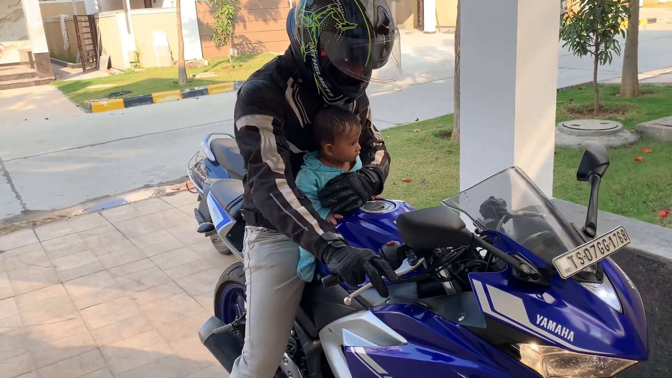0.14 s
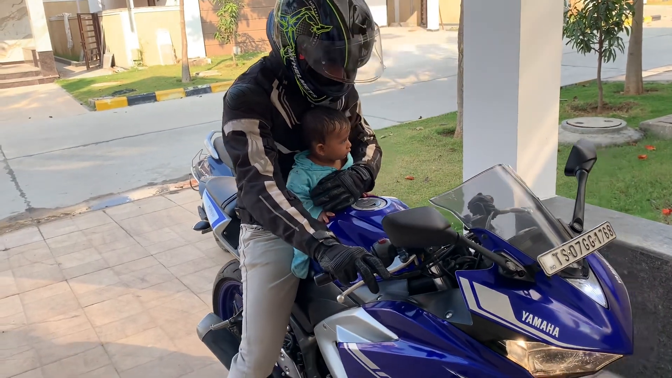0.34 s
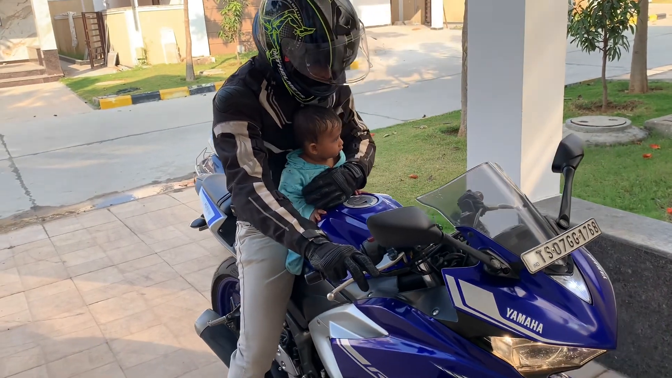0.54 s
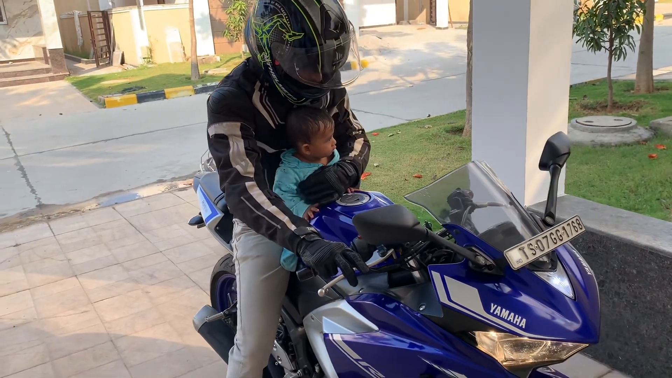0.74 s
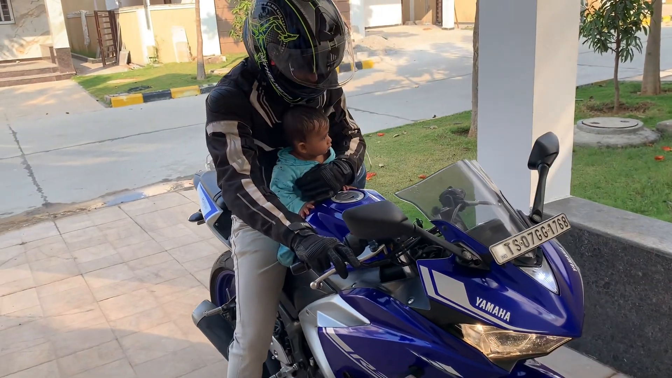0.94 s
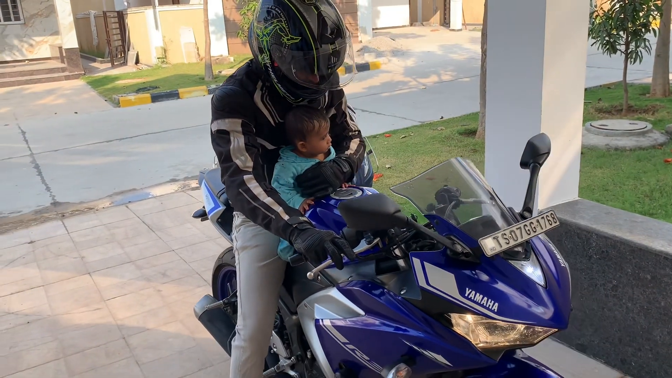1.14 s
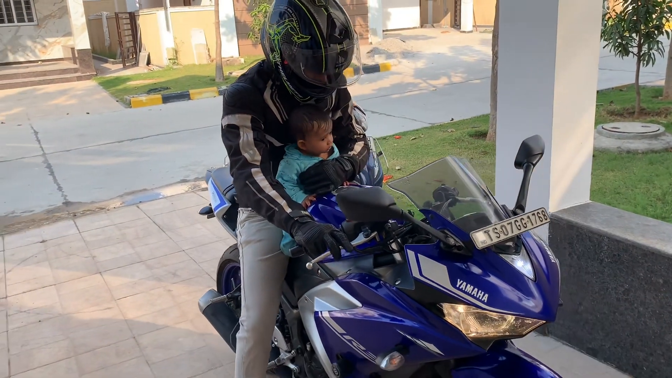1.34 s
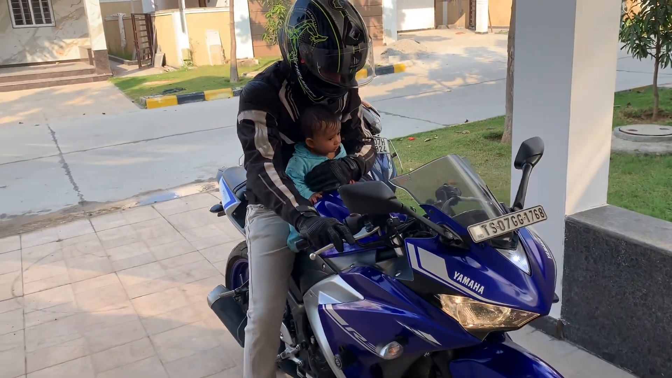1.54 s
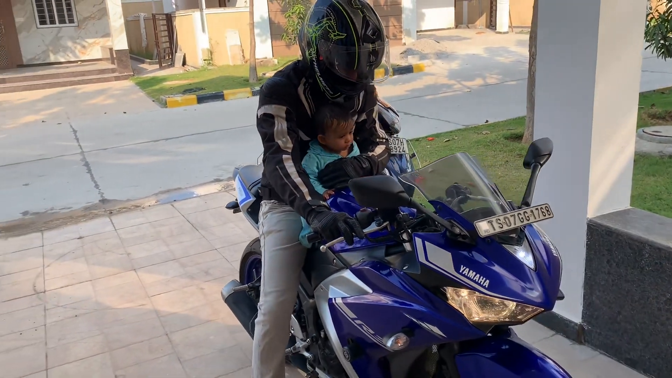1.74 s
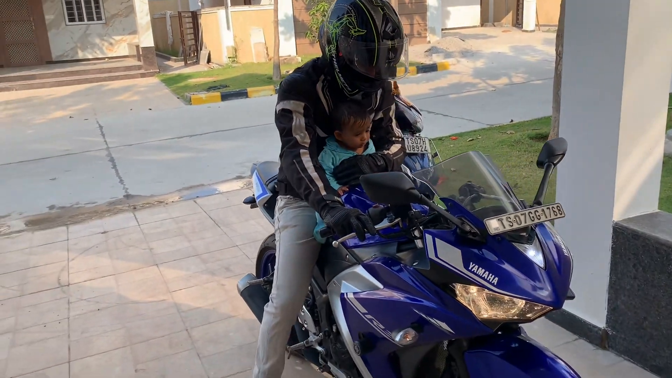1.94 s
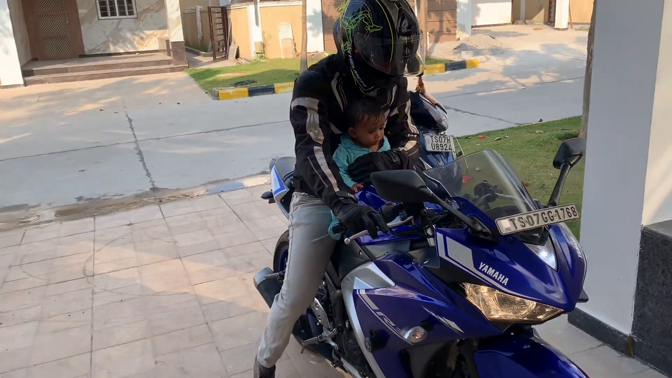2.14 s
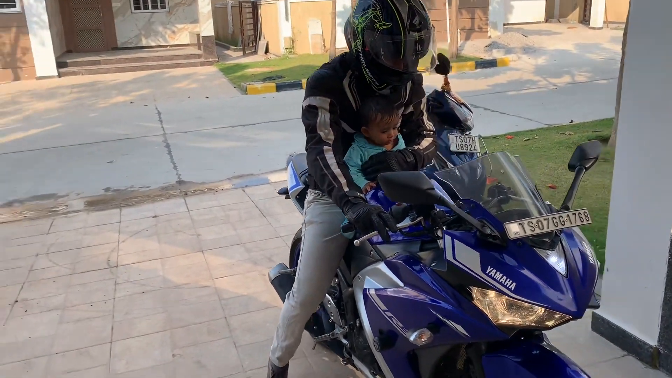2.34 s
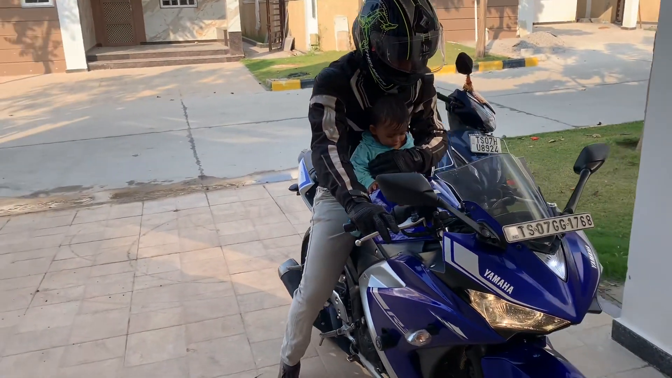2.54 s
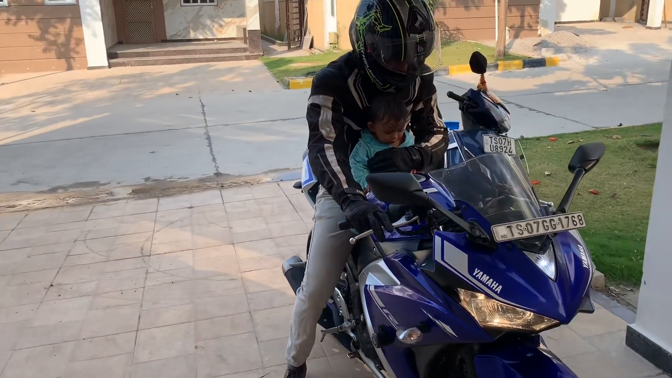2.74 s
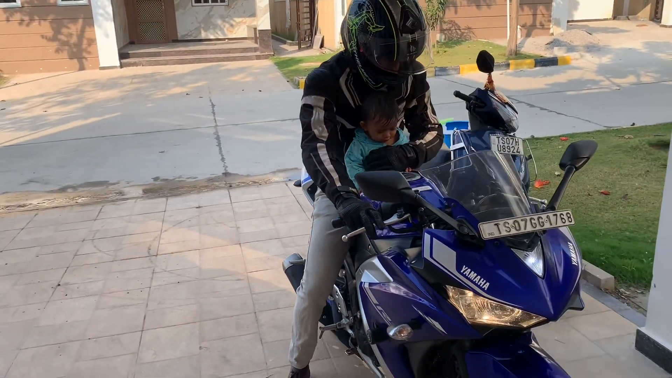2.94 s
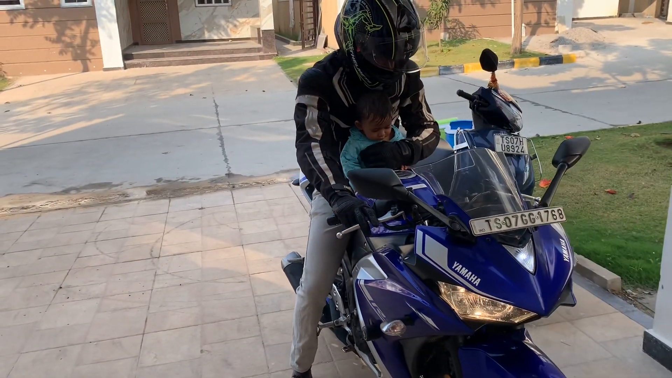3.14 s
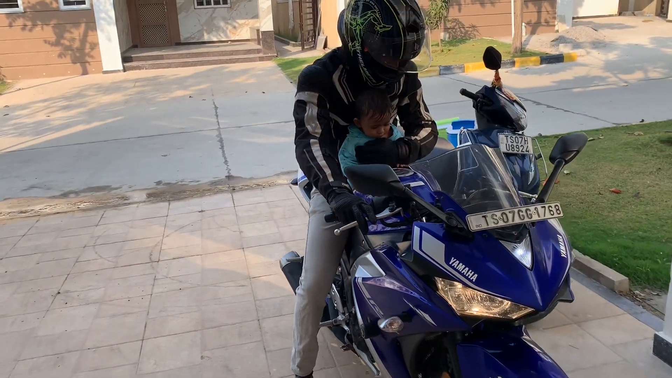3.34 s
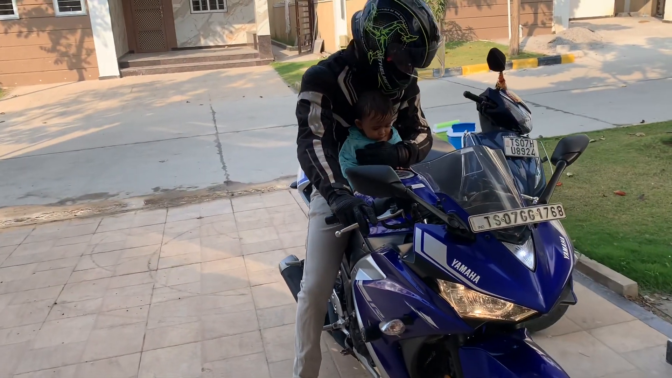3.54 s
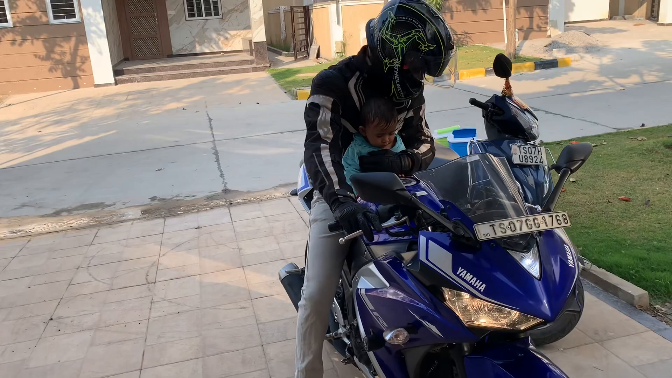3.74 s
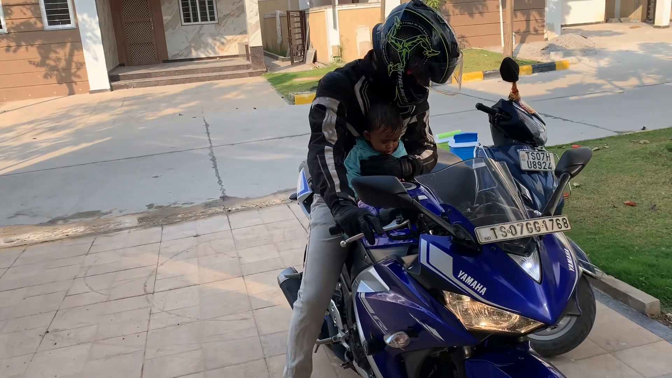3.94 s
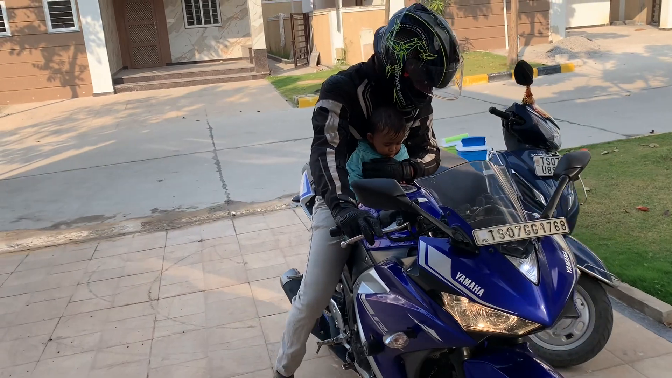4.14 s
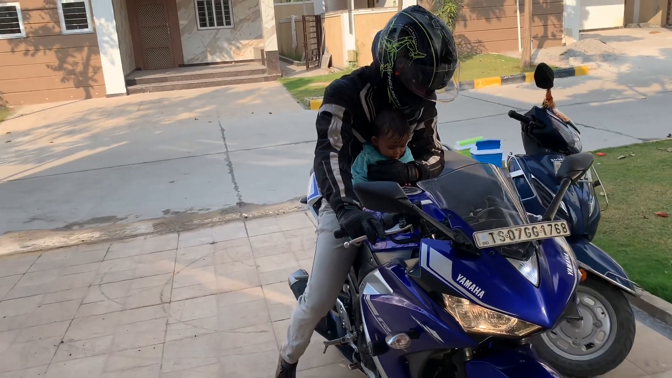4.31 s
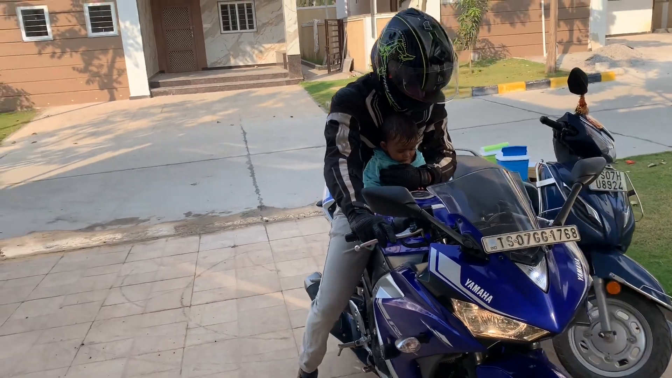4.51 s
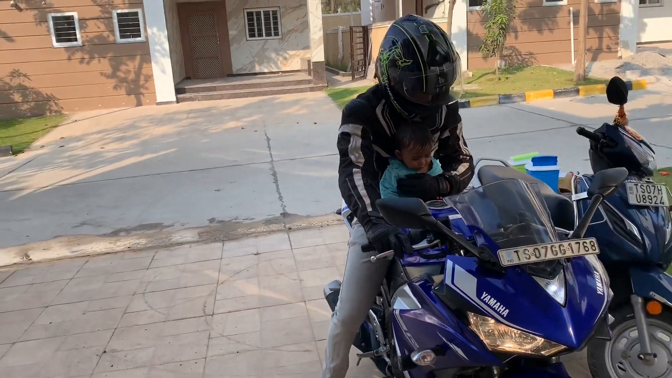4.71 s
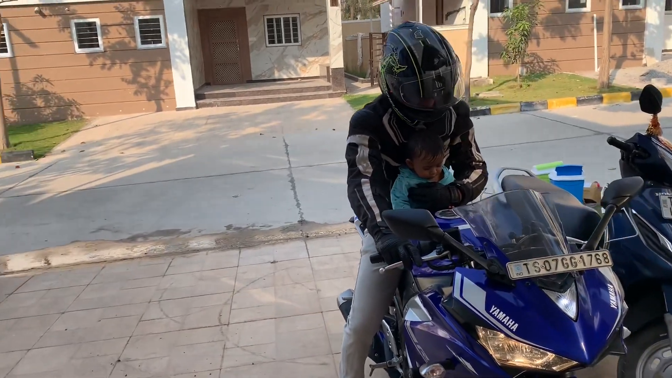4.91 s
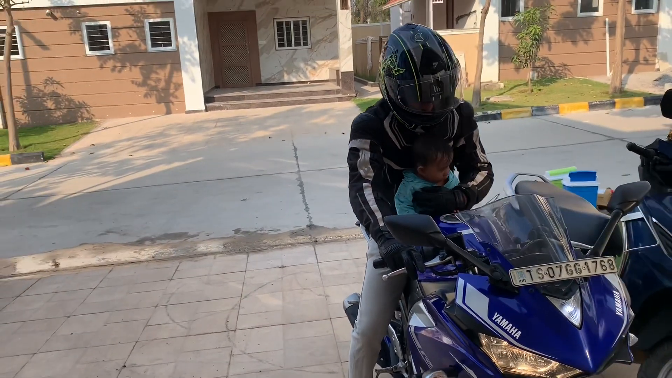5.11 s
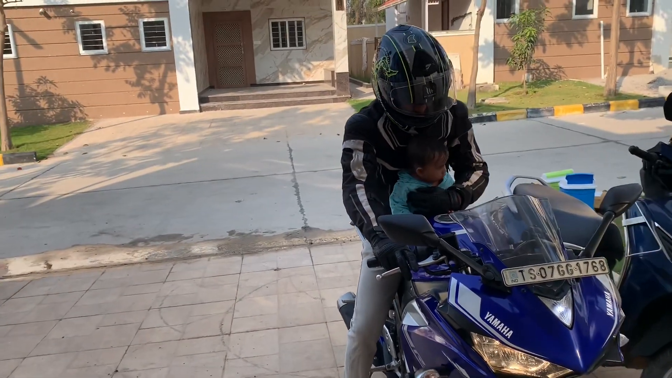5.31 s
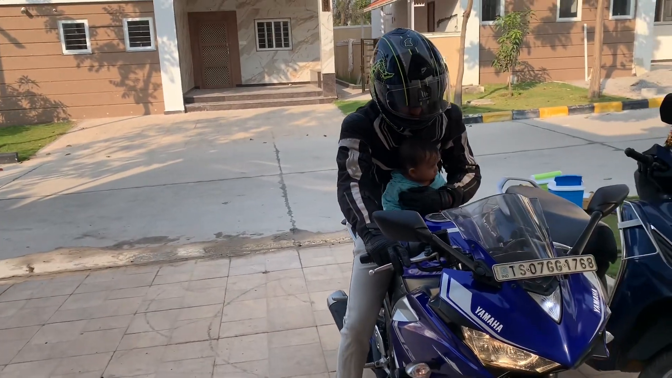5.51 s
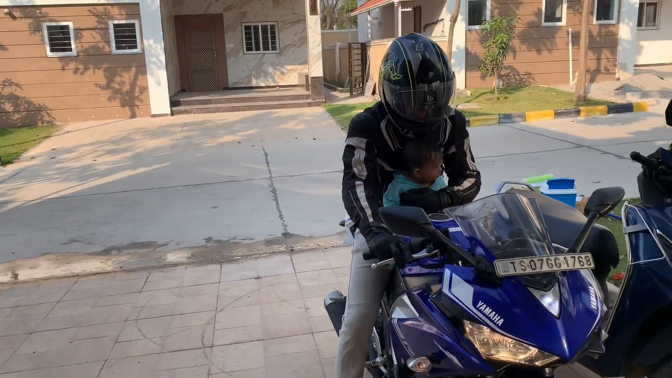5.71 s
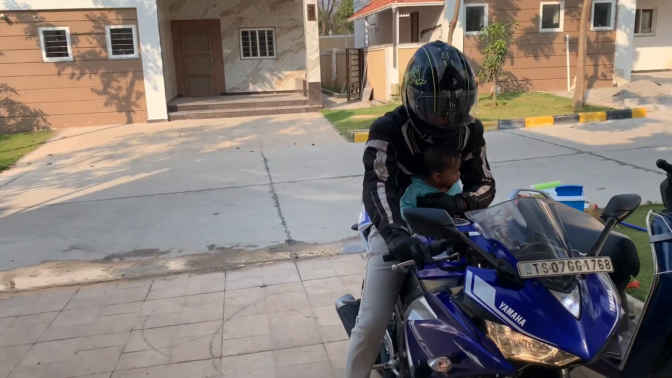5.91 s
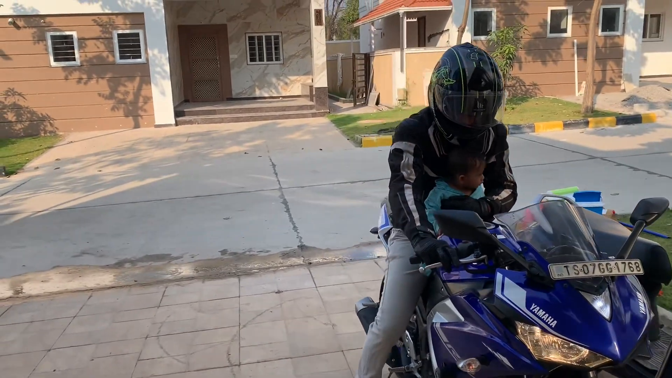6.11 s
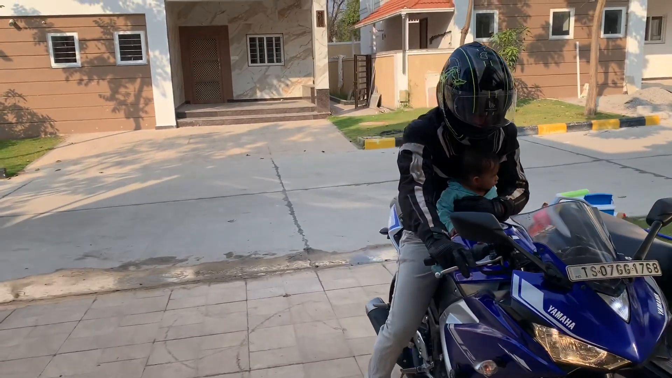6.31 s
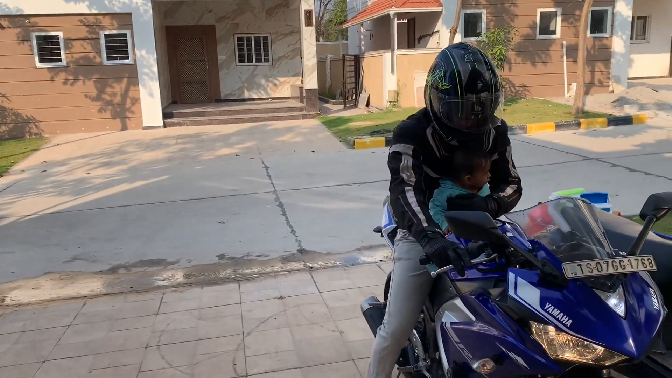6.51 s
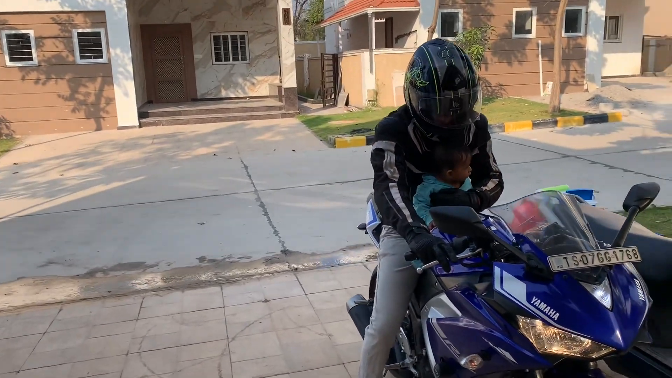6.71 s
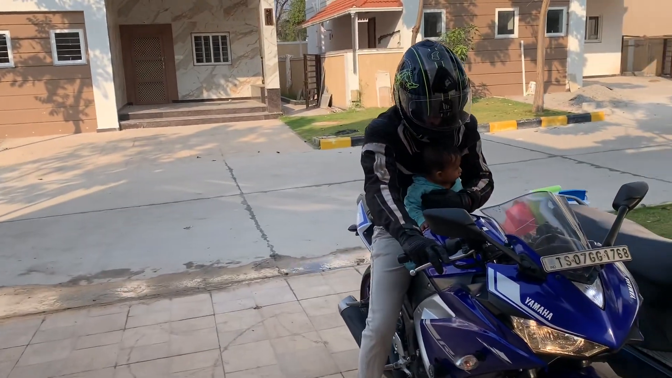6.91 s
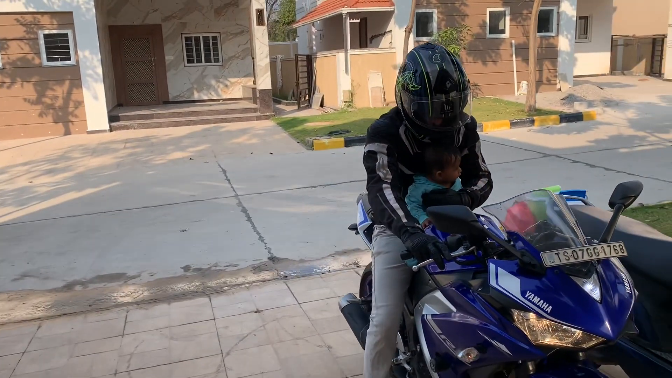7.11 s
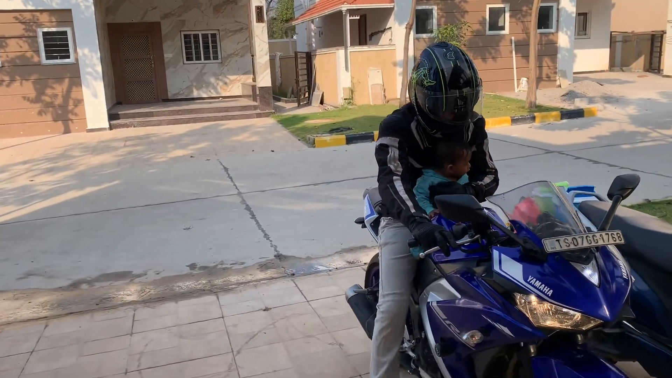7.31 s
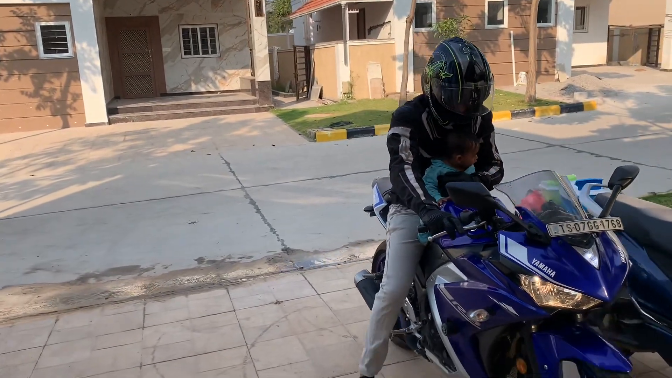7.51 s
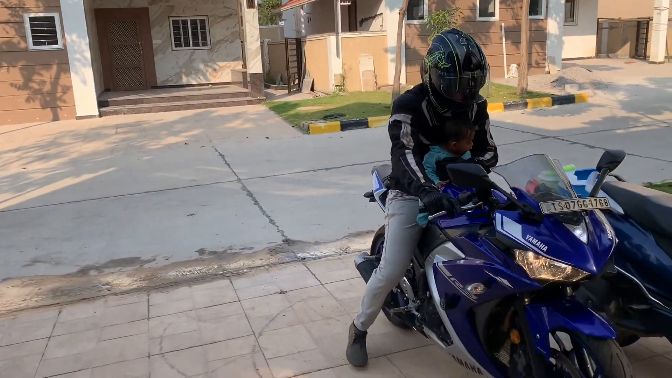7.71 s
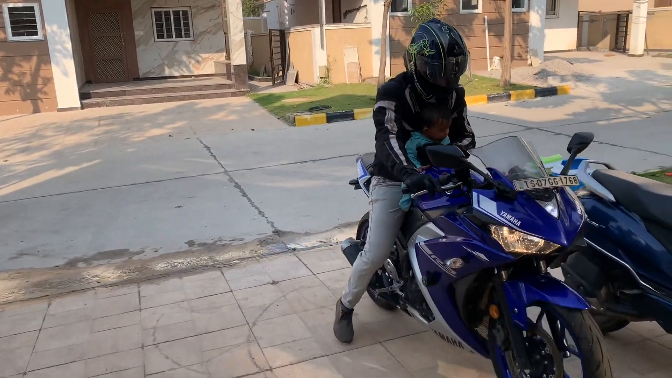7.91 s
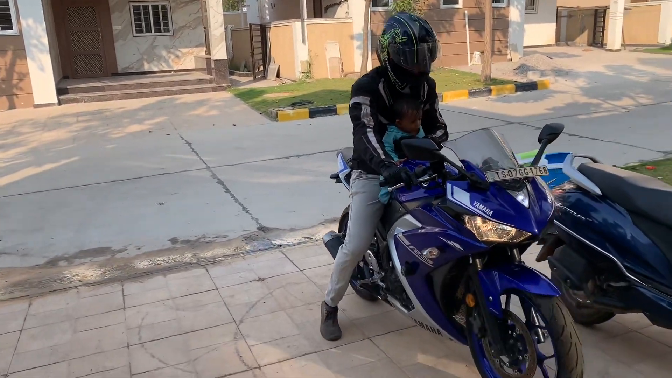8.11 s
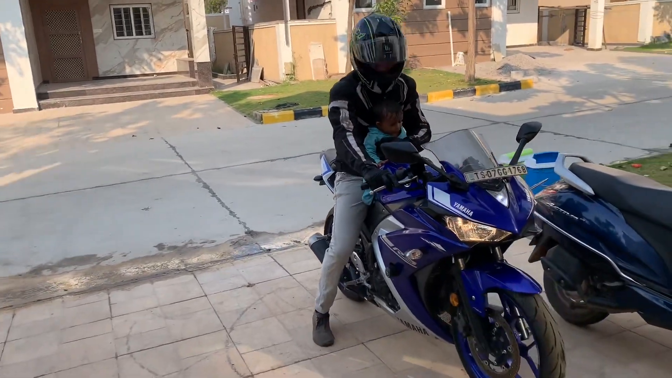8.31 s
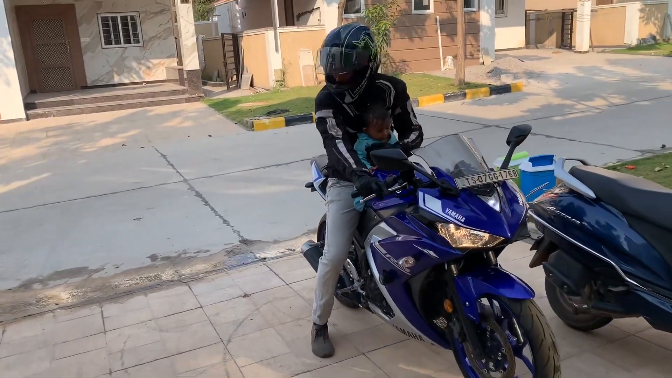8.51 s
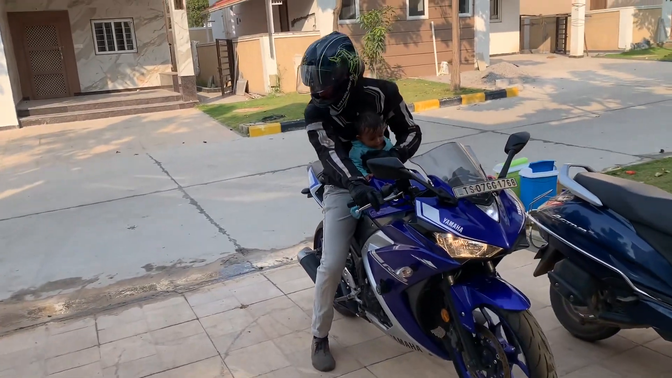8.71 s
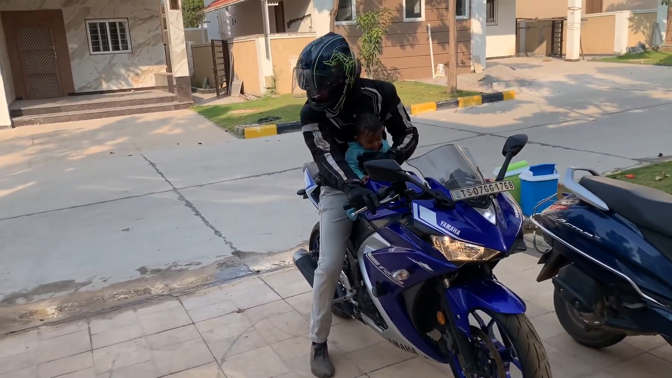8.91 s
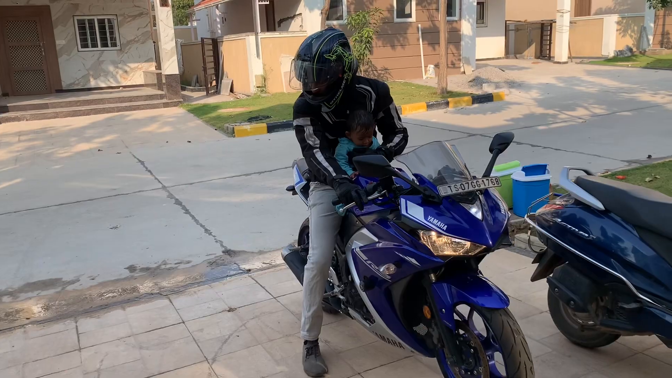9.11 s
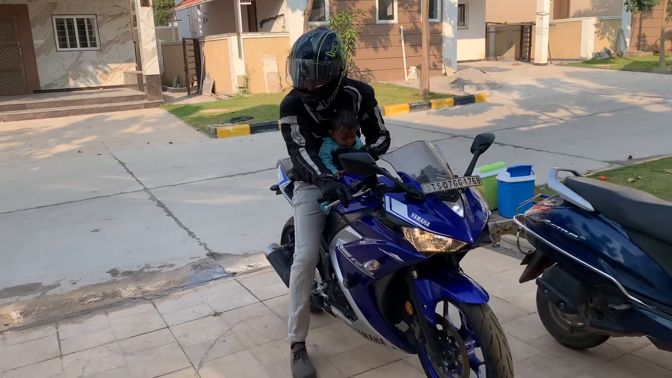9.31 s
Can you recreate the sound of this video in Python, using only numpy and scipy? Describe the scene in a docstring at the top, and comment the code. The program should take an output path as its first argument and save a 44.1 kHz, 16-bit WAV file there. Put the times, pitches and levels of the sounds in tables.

```python
"""A parallel-twin motorcycle idles on a paved drive beside a house, its idle loping and slowly climbing.
Beside it, uneven firing pairs ring silencer and pipe; tappets chatter, and cam chain and valves rustle and click.
Hard knocks ring the head from 2.4 s, bright ticks dot the sound from 3 s. The listener moves to the front by
6.2 s and backs away: the boom sinks, the deep thud shows more, a wall echo lengthens and porch reflections shift.
At 8 s a faint rasp of narrow noise slides down and fades, then two last ticks fall."""
import sys
import numpy as np
from scipy import signal
from scipy.fft import rfft, irfft, next_fast_len
from scipy.io import wavfile
from scipy.ndimage import uniform_filter1d, map_coordinates

SR = 44100
rng = np.random.default_rng(int(sys.argv[2]) if len(sys.argv) > 2 else 0)


def put_to_file(sound):
    """Save the sound as 16-bit audio at rate SR, in the file named by the first command-line argument."""
    columns = np.atleast_2d(sound).T  # one column per channel
    safe = np.clip(columns, -1, 1)
    whole_steps = np.round(safe * 32767)
    wavfile.write(sys.argv[1], SR, whole_steps.astype(np.int16))


N = 412335
SIZE = next_fast_len(N + SR // 2, True)  # the engine is already running before time zero
TIME = (np.arange(SIZE) - (SIZE - N)) / SR
FREQ = np.maximum(np.arange(SIZE // 2 + 1) * SR / SIZE, 1e-3)


def undb(db):
    """Decibels to gain."""
    return 10 ** (np.asarray(db) / 20)


def curves(table):
    """Each column of a table, joined by straight lines in time."""
    seconds, *columns = np.transpose(table)
    return [np.interp(TIME, seconds, column) for column in columns]


def unit(x):
    """Scale to rms 1."""
    return x / np.sqrt(np.mean(x ** 2))


def even(x, size=13000):
    """Scale to rms 1 over every few engine cycles; size in samples."""
    power = uniform_filter1d(uniform_filter1d(x ** 2, size), size // 2)
    return x / np.sqrt(power + 1e-18)


def colour(x, points):
    """Filter by an outline of (pitch_hz, gain_db) that falls away beyond its ends."""
    hz, db = np.transpose(points)
    gain = undb(np.interp(np.log(FREQ), np.log(hz), db))
    low_end = np.minimum(FREQ / hz[0], 1) ** 2
    high_end = np.minimum(hz[-1] / FREQ, 1) ** 2
    return irfft(rfft(x) * gain * low_end * high_end, SIZE)


def ring(x, hz, width):
    """One resonance, gain 1 at its centre."""
    return signal.lfilter(*signal.iirpeak(hz, hz / width, fs=SR), x)


def highpass(x, hz, order):
    """Take away what lies below hz."""
    return signal.sosfilt(signal.butter(order, hz, "high", fs=SR, output="sos"), x)


def noise():
    """White noise."""
    return rng.standard_normal(SIZE)


def grains(rate):
    """Dense tiny metal contacts of uneven size, about rate of them a second."""
    return unit((rng.random(SIZE) < rate / SR) * noise())


def wander(rate):
    """A random drift: rate fresh points a second joined by straight lines."""
    points = rng.standard_normal(int(rate * SIZE / SR) + 2)
    return 1.67 * np.interp(np.linspace(0, len(points) - 1, SIZE), np.arange(len(points)), points)


def strokes(cycle, place, scatter_db, jitter_s):
    """One impulse a cycle at the given place, each a little different in size and timing."""
    turns = np.arange(int(cycle[0]) - 2, int(cycle[-1]) + 2) + place
    chance = rng.standard_normal((len(turns), 2))
    on_time = np.interp(turns, cycle, np.arange(SIZE), left=-SIZE, right=-SIZE)
    at = on_time + jitter_s * SR * chance[:, 1]
    inside = (at >= 0) & (at < SIZE)
    return np.bincount(at[inside].astype(int), undb(scatter_db * chance[inside, 0]), SIZE)


def gate(cycle, place, rise, decay):
    """A swell and fade once a cycle; rise and decay in cycles."""
    age = (cycle - place) % 1
    return (1 - np.exp(-age / rise)) * np.exp(-age / decay)


def fading(kicks, decay_s):
    """Each impulse dies away exponentially."""
    return signal.lfilter([1], [1, -np.exp(-1 / (decay_s * SR))], kicks)


def struck(table, gain_db, decay_s):
    """Short bursts of noise from rows of (start_s, level_db)."""
    starts = np.searchsorted(TIME, [start for start, _ in table])
    kicks = np.bincount(starts, undb([db + gain_db for _, db in table]), SIZE)
    return noise() * fading(kicks, decay_s)


# stereo width, narrow in the bass: pitch_hz, side_gain_db
WIDTH = [(40, -28), (110, -21.5), (200, -19), (380, -11), (700, -4), (1300, -5.5), (2400, -1.5),
         (4400, -1.5), (16000, 7)]


def stereo(mid, side, pan_db):
    """Two microphones: alike in the bass, ever more different in the treble; pan is left minus right."""
    side = colour(side, WIDTH)
    return np.array([mid + side, mid - side]) * undb(np.array([[pan_db], [-pan_db]]) / 2)


# the walk round the bike: time_s, place (0 beside, 1 fairing, 2 front corner, 3 ahead, 4 far ahead)
WALK = [(1.8, 0), (2.6, 1), (3.9, 1), (4.6, 2), (5.8, 2), (6.2, 3), (6.9, 3), (7.7, 4)]


def from_here(dbs):
    """Gain along the walk, from one level for each place."""
    place, = curves(WALK)
    return undb(np.interp(place, np.arange(len(dbs)), dbs))


# the listener backs away from the engine: time_s, distance_m
DISTANCE = [(0.0, 1.5), (3.0, 1.49), (6.0, 1.65), (8.3, 2.4), (9.35, 2.33)]


def heard(db_at_1m, shade_db=0):
    """Gain of an engine part: weaker with distance, and changed by shade_db for each place along the walk."""
    metres, = curves(DISTANCE)
    place, = curves(WALK)
    return undb(db_at_1m + shade_db * place) / metres


# the idle climbs as the engine warms and lopes, sagging and catching up: time_s, crank_speed_rpm
SPEED = [(0.0, 1516), (1.05, 1569), (1.35, 1597), (1.65, 1502), (2.1, 1610), (2.7, 1583), (2.85, 1629),
         (3.0, 1585), (3.75, 1678), (3.9, 1574), (4.2, 1664), (4.65, 1665), (4.95, 1589), (5.1, 1665),
         (5.4, 1635), (5.7, 1693), (6.0, 1684), (6.15, 1606), (6.45, 1651), (7.05, 1615), (7.65, 1641),
         (7.8, 1584), (8.1, 1674), (8.25, 1614), (9.15, 1627), (9.35, 1710)]
# the camshaft hunts ahead and behind: drift scale (cycles), fresh drift points a second
HUNT_CYCLES, HUNT_PER_S = .004, 9


def camshaft():
    """Four-stroke cycles since time zero: one camshaft turn for every two of the crank."""
    rpm, = curves(SPEED)
    cycle = np.cumsum(rpm) / (2 * 60 * SR)
    return cycle - cycle[-N] + HUNT_CYCLES * wander(rate=HUNT_PER_S)


def sag(size=50000):
    """How far the engine lies below its average speed nearby (rev/min)."""
    rpm, = curves(SPEED)
    return uniform_filter1d(rpm, size) - rpm


def porch(x, t60, wet_db, count=30, size=2600):
    """Early reflections off porch and paving: random echo patterns, each fading into the next in turn."""
    spot = np.linspace(0, count - 1, SIZE)
    echoes = rng.standard_normal((count, size)) * undb(-60 * np.arange(size) / SR / t60)
    wet = np.zeros(SIZE)
    for k, echo in enumerate(echoes):
        near = np.abs(spot - k) < 1
        reflected = signal.oaconvolve(x[near], echo / np.linalg.norm(echo))[:near.sum()]
        wet[near] += np.cos(np.pi / 2 * (spot[near] - k)) * reflected
    return (x + undb(wet_db) * wet) / np.hypot(1, undb(wet_db))


# a wall returns the exhaust, later as the listener backs away: time_s, lag_s, echo_db
WALL = [(3.5, .006, -20), (5.0, .007, -7), (6.5, .0148, -7), (7.8, .0218, -4), (9.35, .0225, -4)]


def wall(x):
    """Add one echo whose lag and level change along the walk."""
    lag_s, db = curves(WALL)
    return x + undb(db) * map_coordinates(x, [np.arange(SIZE) - lag_s * SR], order=1)


# stray metallic ticks: start_s, relative_level_db
TICKS = [(2.9741, -37), (4.787, -28), (6.6054, -33), (6.8987, -40), (8.817, -33), (9.1152, -32)]


def ticks():
    """Now and then a loose part gives a short bright tick: a noise burst without its lows."""
    return highpass(struck(TICKS, gain_db=-7, decay_s=0.0091), 3000, order=2)


RASP_S, RASP_LENGTH_S, RASP_ATTACK_S, RASP_DECAY_S = 7.99, .55, 0.012, 0.76
RASP_FROM_HZ, RASP_TO_HZ, RASP_WIDTH_HZ = 1500, 852, 180
RASP_DB = -43.5  # before the envelope


def rasp():
    """A narrow band of noise, slow flutter on a gliding sine, that starts at once, sinks and fades."""
    age = np.clip(TIME - RASP_S, 0, RASP_LENGTH_S)
    hz = RASP_FROM_HZ * (RASP_TO_HZ / RASP_FROM_HZ) ** (age / RASP_LENGTH_S)
    envelope = (1 - np.exp(-age / RASP_ATTACK_S)) * np.exp(-age / RASP_DECAY_S)
    envelope = envelope * np.sqrt(1 - age / RASP_LENGTH_S)  # silent at the end
    lowpass = signal.butter(2, RASP_WIDTH_HZ / 2, fs=SR, output="sos")
    flutter = signal.sosfilt(lowpass, [noise(), noise()])
    carrier = np.sin(2 * np.pi * np.cumsum(hz) / SR)
    mid, side = undb(RASP_DB) * envelope * unit(flutter * carrier)
    return stereo(mid, side, pan_db=1)


# colour of the steady whirr: pitch_hz, gain_db
WHIRR = [(20, -6), (42, -4), (150, -3), (230, -5), (320, -8), (600, -8), (850, -15), (2000, -41)]
WHIRR_DB = -32.5  # at 1 m


def whirr():
    """Steady low noise of the running engine, weaker with distance."""
    return heard(WHIRR_DB) * unit(colour(noise(), WHIRR))


# valve gear in each cycle: place_cycles (0-1), relative_level_db, decay_cycles
VALVES = [(.54, 15, 1), (.67, 6, 0.053), (.86, -6, 0.32), (.1, -14, 0.66)]


def valve_load(cycle):
    """How hard the valve gear works along the cycle."""
    return unit(sum(undb(db) * gate(cycle, place, rise=0.05, decay=decay) for place, db, decay in VALVES))


def valve_taps(cycle, size=1500):
    """Each valve seats with a short knock of fading noise; half the table's dB spread."""
    fade = np.exp(-np.arange(size) / SR / 0.043)
    seats = sum(undb(db / 2) * strokes(cycle, place, scatter_db=4.5, jitter_s=0.00024)
                for place, db, _ in VALVES)
    return unit(noise() * signal.oaconvolve(seats, fade)[:SIZE])


# colour of the bright spray: pitch_hz, gain_db
HISS = [(4200, -24), (5500, -4.5), (6600, -1), (8500, -2.5), (11000, 1), (13000, -6.5), (15300, -3)]
HISS_DB, HISS_SHADE_DB = -35.5, -0.27  # at 1 m before the drift; change for each place along the walk
HISS_LAG_S = .000227  # the left channel comes this much later, opposite in sign
# one valve's sharp click: place in the cycle (0-1), decay (s), level against the spray before colouring (dB)
CLICK_PLACE, CLICK_DECAY_S, CLICK_DB = 0.94, .009, -11


def hiss(cycle):
    """Chain and valves spray fine bright contacts, with one sharp click a cycle as a valve shuts."""
    spray = unit(grains(rate=16000) * (.4 + valve_load(cycle)))
    shuts = strokes(cycle, CLICK_PLACE, scatter_db=3.5, jitter_s=.002)
    click = unit(noise() * fading(shuts, CLICK_DECAY_S))
    bright = unit(colour(spray + undb(CLICK_DB) * click, HISS))
    sound = heard(HISS_DB, HISS_SHADE_DB) * undb(0.79 * wander(rate=20)) * bright
    return np.array([-np.roll(sound, round(HISS_LAG_S * SR)), sound])


# ringing covers and gears: pitch_hz, width_hz, relative_level_db
COVERS = [(758, 15, -13), (967, 52, -6), (1108, 43, -2.5), (1227, 113, -6), (1385, 35, -14)]
COVERS_DB = -39  # at 1 m


def covers(clatter, taps):
    """Clatter and valve taps ring the covers, each rattling more or less from moment to moment."""
    drive = clatter + 0.25 * taps
    rattle = sum(undb(db + 1.8 * wander(rate=15)) * ring(drive, hz, width) for hz, width, db in COVERS)
    return heard(COVERS_DB) * unit(rattle)


# the hardest tappet blows: start_s, relative_level_db
KNOCKS = [(2.439, -30), (2.584, -28), (2.661, -32), (2.673, -32), (3.41, -34), (3.999, -29), (7.203, -32)]
# what such a blow rings: pitch_hz, width_hz, gain_db
KNOCK_MODES = [(2570, 92, 1.5), (2750, 110, -10), (2300, 92, -12)]


def knocks():
    """Now and then a tappet knocks hard on the head and rings out above the chatter."""
    blows = struck(KNOCKS, gain_db=19, decay_s=.004)
    return sum(undb(db) * ring(blows, hz, width) for hz, width, db in KNOCK_MODES)


# the cylinder head rings under the tappets: pitch_hz, width_hz, relative_level_db
HEAD = [(1820, 44, 2), (1896, 52, 2.5), (2084, 130, -2.5), (2206, 34, 4), (2320, 65, -3), (2536, 76, -3),
        (2650, 70, 2.5)]
# how much of the head is uncovered: beside_db, fairing_db, corner_db, ahead_db, far_ahead_db
HEAD_OPEN_DB = [-1, 1.5, 2, 3, 2]
TAPPETS_DB = -41.5  # at 1 m, before the head's openness
# place in the cycle (0-1), decay (cycles), contacts a second on each note before the burst shapes them
CHATTER_PLACE, CHATTER_DECAY, CHATTER_PER_S = 0.51, 0.46, 1800
CHATTER_WAVER_DB = 2  # drift scale: harder in some cycles than in others


def tappets(cycle):
    """Once a cycle a burst of small contacts rings the cylinder head, each contact on a note of its own."""
    burst = gate(cycle, CHATTER_PLACE, rise=0.04, decay=CHATTER_DECAY)
    burst = burst * undb(CHATTER_WAVER_DB * wander(rate=13))
    rings = sum(undb(db) * ring(grains(rate=CHATTER_PER_S) * burst, hz, width) for hz, width, db in HEAD)
    return heard(TAPPETS_DB) * from_here(HEAD_OPEN_DB) * unit(rings)


# colour of the engine case: pitch_hz, gain_db
CASE = [(400, 1.5), (620, -7), (820, -12.5), (1100, -3), (1350, -7), (1650, -5.5), (2000, -4.5), (2650, -6),
        (3400, -10.5), (4300, -11), (5100, -16), (6500, -13), (7500, -21), (9500, -70)]
CASE_DB = -32.5  # at 1 m


def machinery(cycle):
    """Valve gear and cam chain rustle through the engine case over whirr, covers and tappets."""
    taps = valve_taps(cycle)
    rustle = grains(rate=24000) * undb(0.53 * wander(rate=20)) * (1 + 0.21 * valve_load(cycle))
    clatter = unit(rustle + 0.19 * taps)
    case = heard(CASE_DB) * unit(colour(clatter, CASE))
    engine = case + covers(clatter, taps) + whirr() + tappets(cycle)
    return porch(engine, t60=0.085, wet_db=-9) + knocks() + ticks()


# balance of the machinery: pitch_hz, left_minus_right_db
TILT = [(20, 0), (1100, .5), (2000, 0), (2700, -1), (3500, -1.3), (4800, -3), (6500, -2), (20000, 0)]


def wide_machinery(cycle):
    """A broad source: the engine's parts reach the two microphones by unrelated paths."""
    left, right = stereo(machinery(cycle), machinery(cycle), pan_db=0)
    left = colour(left, np.multiply(TILT, (1, .5)))
    right = colour(right, np.multiply(TILT, (1, -.5)))
    return np.array([left, right])


# pipe resonances: pitch_hz, width_hz, beside_db, fairing_db, corner_db, ahead_db, far_ahead_db
# (levels before bark and drift)
PIPE = [(125.2, 10, -64, -56, -59, -40, -33.5), (141, 35, -30, -37, -41.5, -34.5, -41),
        (170.7, 29, -30.5, -36, -31.5, -33.5, -36), (203, 23, -33.5, -39.5, -39.5, -38, -39.5),
        (271.7, 26, -42, -38.5, -41.5, -45.5, -44), (370.5, 14.5, -41, -40.5, -48, -57, -65),
        (490, 19, -50, -47, -43, -52.5, -49), (526.5, 32, -36.5, -39, -45, -45, -49),
        (546.6, 22.5, -49, -41, -46.5, -45, -49.5), (647, 36, -56, -49, -54, -51, -54.5)]
TURBULENT_HZ = 330  # rough gas drives the resonances from here up
CHAMBER_WIDTH_HZ = 24  # the second chamber is never narrower than this
PIPE_WAVER_DB = 1.3  # drift scale: each firing finds the pipe a little different


def pipe(pulses, gas, bark):
    """Clean pushes ring the low resonances, rough gas the high; two chambers in a row swell before they fade."""
    out = 0
    for hz, width, *dbs in PIPE:
        drive, gain = (pulses, 1) if hz < TURBULENT_HZ else (gas, bark)
        first = ring(drive, hz, width)
        second = ring(first, hz, max(width, CHAMBER_WIDTH_HZ))
        out = out + gain * from_here(dbs) * undb(PIPE_WAVER_DB * wander(rate=13)) * even(second)
    return out


# colour of the baffles: pitch_hz, gain_db
BAFFLES = [(40, -83), (52, 9.5), (115, 10.5), (140, 7.5), (200, -1)]
# the silencer's two close boom modes, balanced against each other:
# pitch_hz, width_hz, beside_db, fairing_db, corner_db, ahead_db, far_ahead_db
BOOM = [(103.6, 1.94, -19, 5.5, 7.5, 1, -21), (100.9, 4, -11, 2, 2.5, 11.5, 15)]
# its deep thud: pitch_hz, width_hz
THUD = (60.7, 23.2)
# the boom fades towards the front and uncovers the thud: time_s, boom_db, thud_db (before the trims)
SILENCER = [(0.0, -10.4, -25.5), (2.2, -11.1, -28), (3.9, -13.5, -29), (4.4, -14.2, -25), (5.0, -14.6, -27),
            (6.0, -16.3, -19.5), (6.2, -18.2, -26), (6.55, -21, -25), (7.0, -17.6, -24.5),
            (7.9, -17.6, -22.5), (9.35, -20, -23.3)]
BOOM_TRIM_DB, THUD_TRIM_DB = 0.27, 1.5


def silencer(pulses):
    """Firing pulses ring two close boom modes and a deep thud behind the baffles."""
    boom_db, thud_db = curves(SILENCER)
    soft = colour(highpass(pulses, 60.0, order=6), BAFFLES)  # a small outlet radiates little deep bass
    boom = sum(from_here(dbs) * ring(soft, hz, width) for hz, width, *dbs in BOOM)  # swells when the idle sags
    boom = undb(boom_db + BOOM_TRIM_DB) * even(boom, size=21000)
    thud = undb(thud_db + THUD_TRIM_DB) * even(ring(soft, *THUD))
    return boom - thud


# the two uneven firings: place_cycles (0-1), relative_push_db, scatter_db, relative_gas_burst_db
FIRINGS = [(.735, -3, 1.8, -5), (.985, 0, .8, 0)]
# the idle control opens when the speed sags, and the upper pipe barks harder (dB per rev/min)
BARK_DB_PER_RPM = .035


def exhaust(cycle):
    """Firings ring the silencer and the pipe; a faint turbulent puff follows each one."""
    kicks = [strokes(cycle, place, scatter_db, jitter_s=.00012) for place, _, scatter_db, _ in FIRINGS]
    pulses = unit(sum(undb(row[1]) * kick for row, kick in zip(FIRINGS, kicks)))
    cracks = unit(sum(undb(row[3]) * kick for row, kick in zip(FIRINGS, kicks)))
    puff_shape = sum(undb(db) * gate(cycle, place, rise=0.049, decay=0.12) for place, _, _, db in FIRINGS)
    puffs = unit(noise() * puff_shape)
    gas = cracks * undb(1.5 * wander(rate=25)) + .2 * puffs
    bark = undb(BARK_DB_PER_RPM * sag())
    sound = silencer(pulses) + pipe(wall(pulses), wall(gas), bark)
    # the wave reaches the two microphones slightly out of step
    return stereo(sound, np.imag(signal.hilbert(sound)), pan_db=-0.5)


def scene():
    """One camshaft times the exhaust, machinery and hiss; the rasp joins on its own."""
    cycle = camshaft()
    return (exhaust(cycle) + wide_machinery(cycle) + hiss(cycle) + rasp())[:, -N:]


TOP_HZ = 15900


def record(dry):
    """A steep low-pass cuts the treble above TOP_HZ."""
    return signal.sosfilt(signal.ellip(10, .1, 80, TOP_HZ, fs=SR, output="sos"), dry)


dry = scene()
out = record(dry)
put_to_file(out)
```